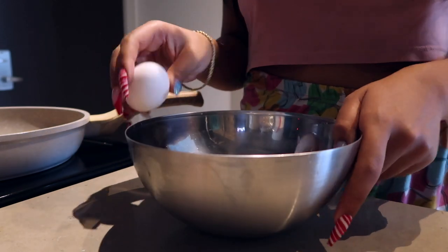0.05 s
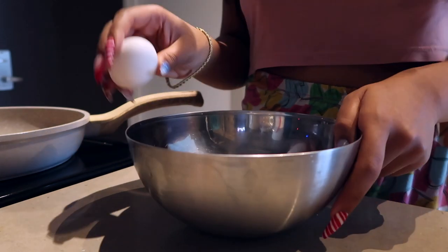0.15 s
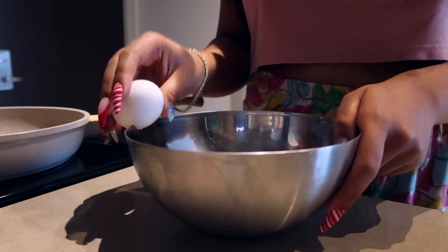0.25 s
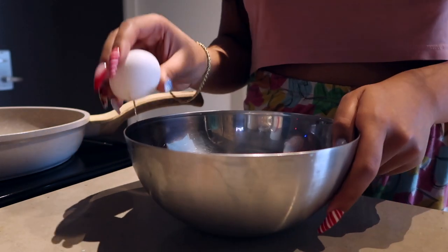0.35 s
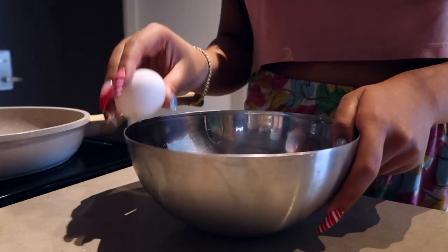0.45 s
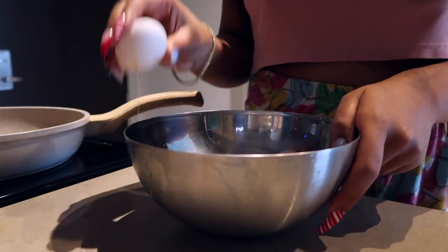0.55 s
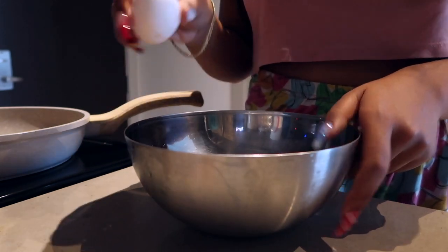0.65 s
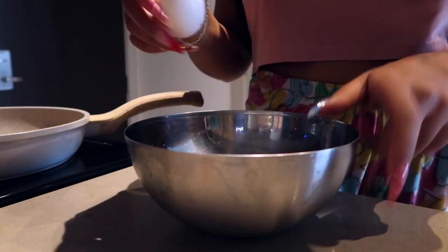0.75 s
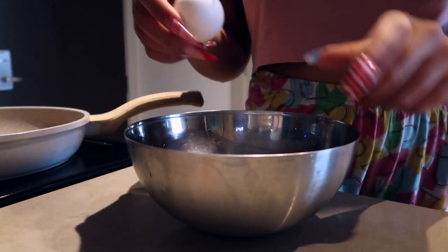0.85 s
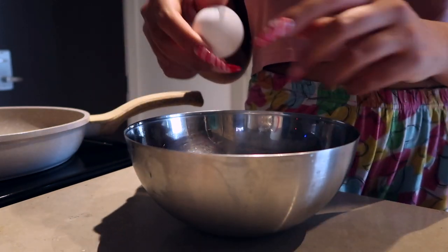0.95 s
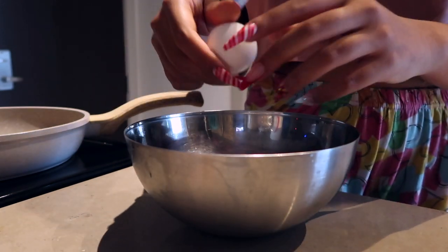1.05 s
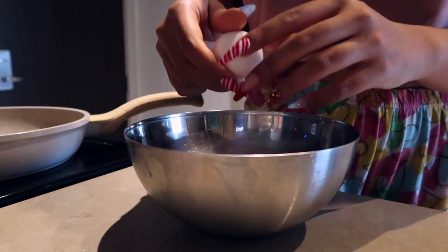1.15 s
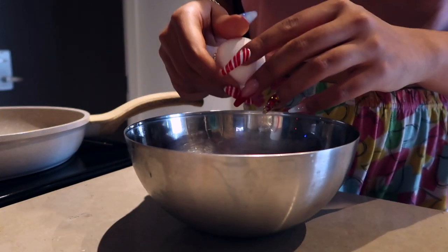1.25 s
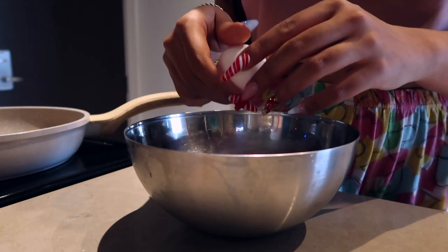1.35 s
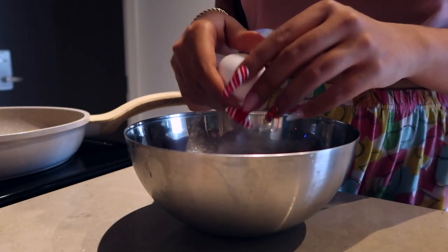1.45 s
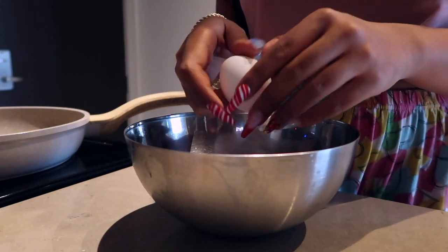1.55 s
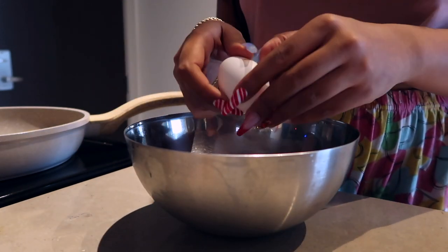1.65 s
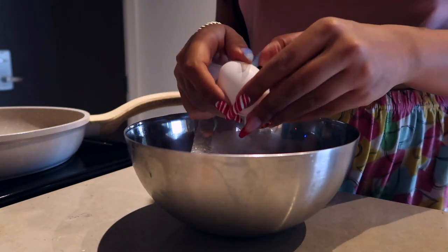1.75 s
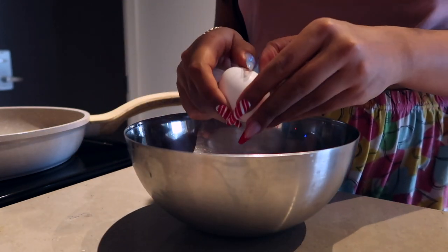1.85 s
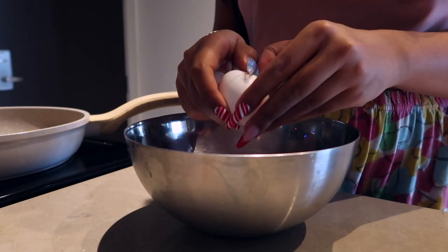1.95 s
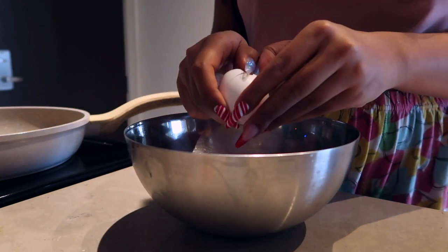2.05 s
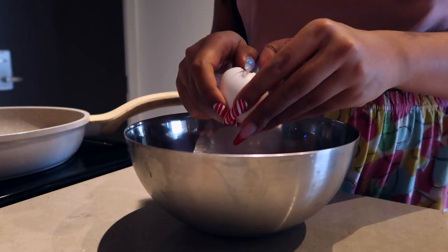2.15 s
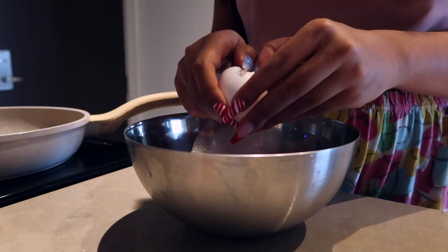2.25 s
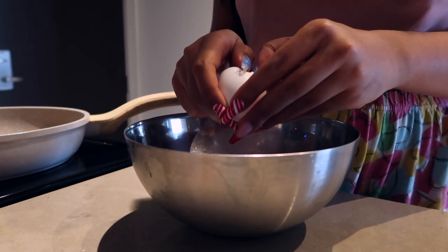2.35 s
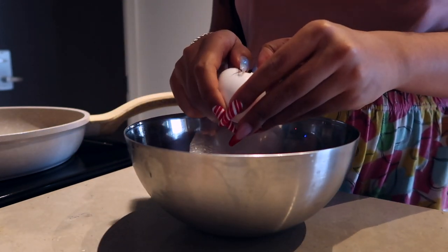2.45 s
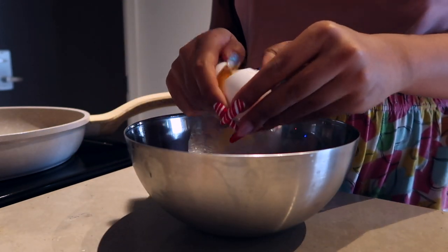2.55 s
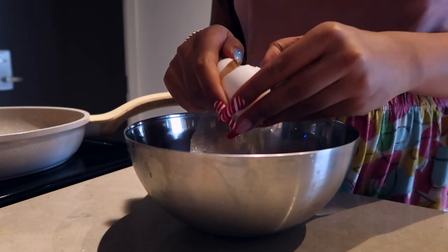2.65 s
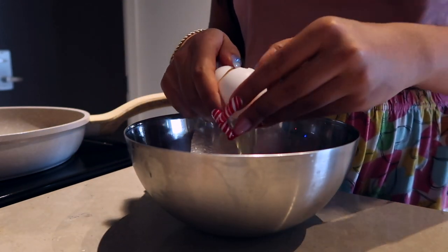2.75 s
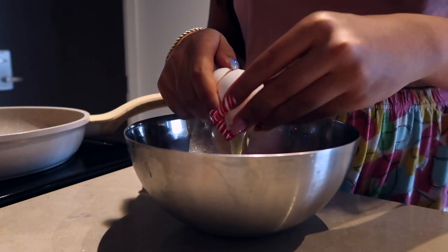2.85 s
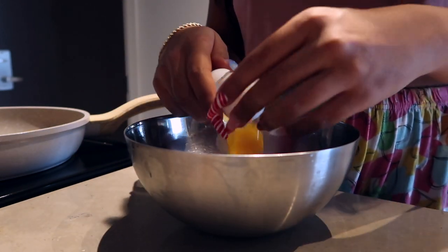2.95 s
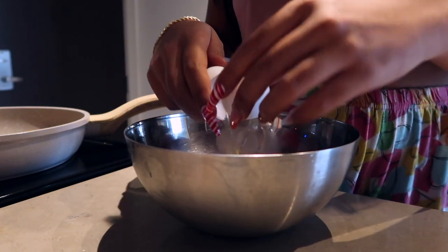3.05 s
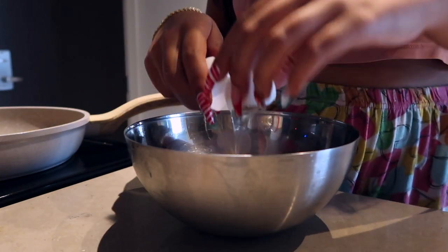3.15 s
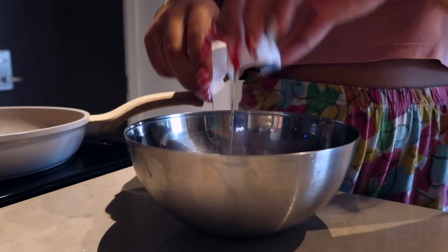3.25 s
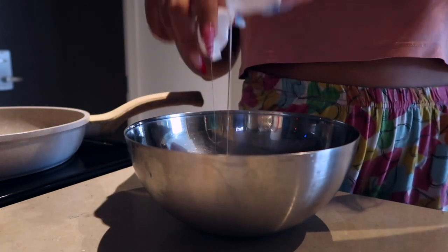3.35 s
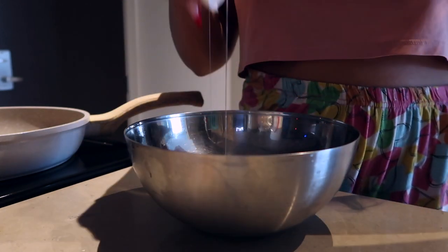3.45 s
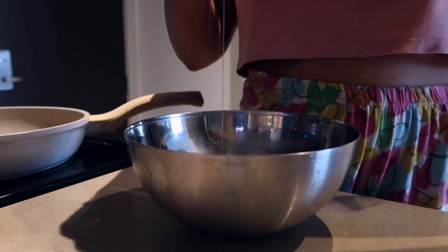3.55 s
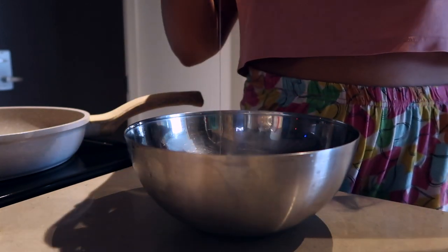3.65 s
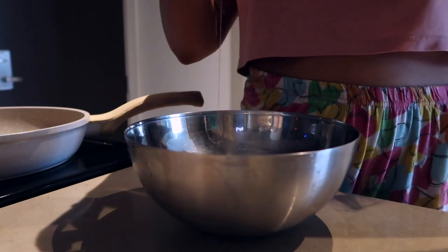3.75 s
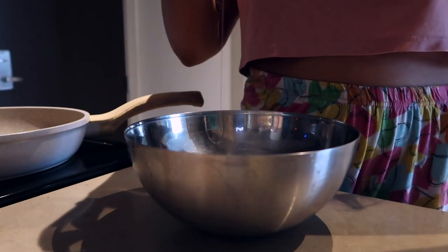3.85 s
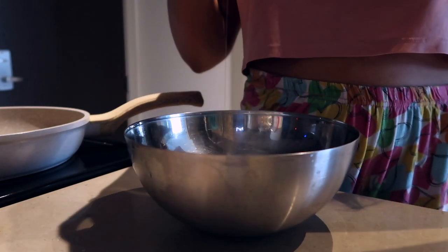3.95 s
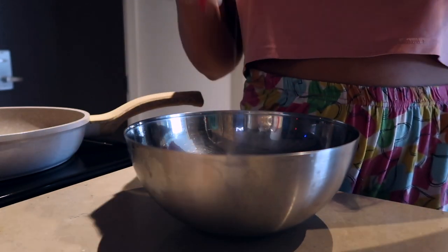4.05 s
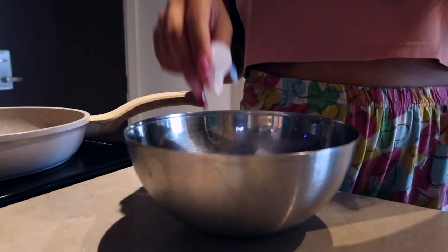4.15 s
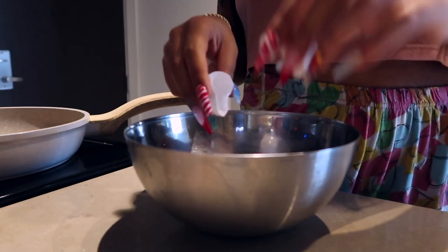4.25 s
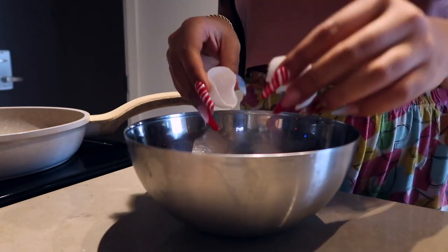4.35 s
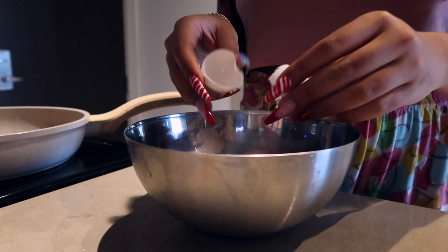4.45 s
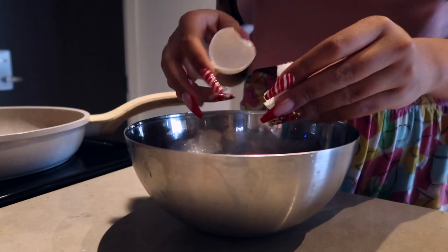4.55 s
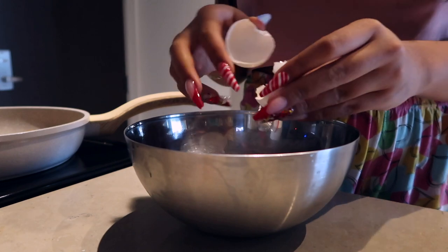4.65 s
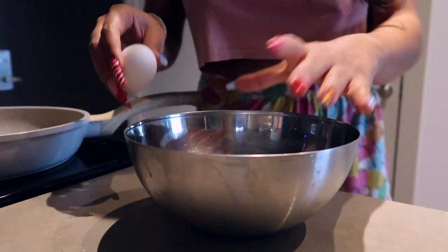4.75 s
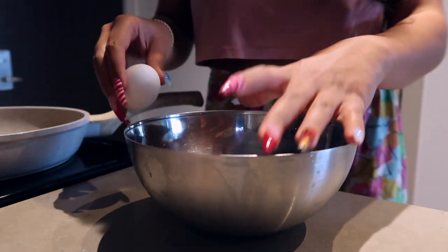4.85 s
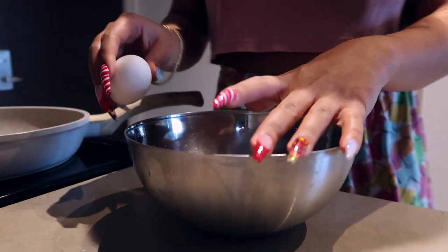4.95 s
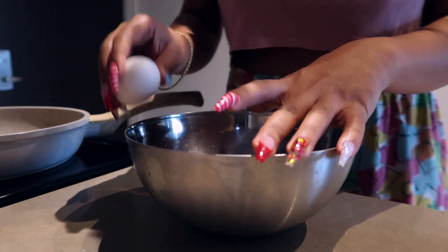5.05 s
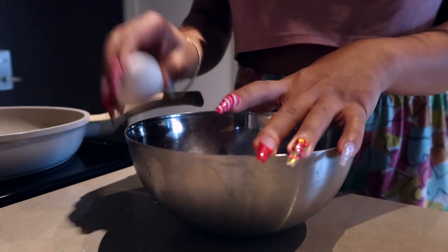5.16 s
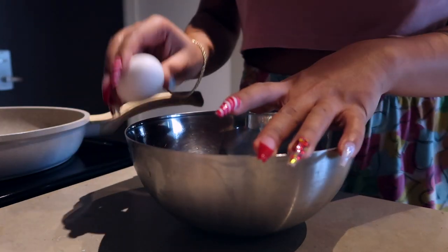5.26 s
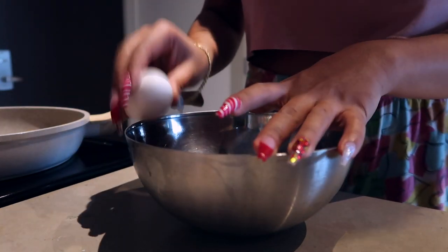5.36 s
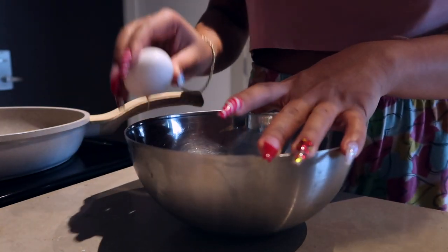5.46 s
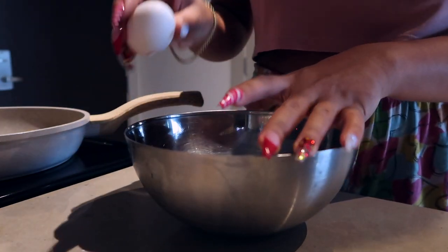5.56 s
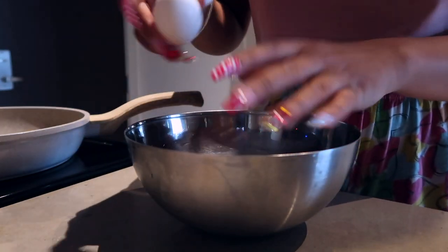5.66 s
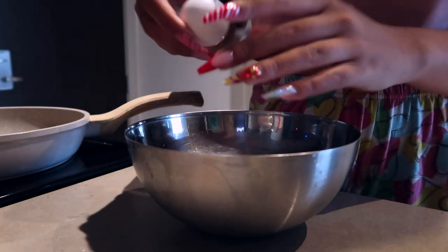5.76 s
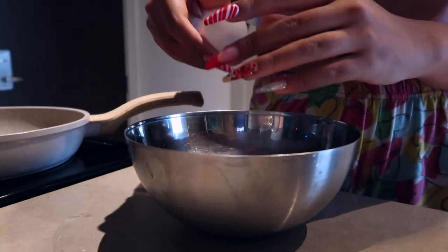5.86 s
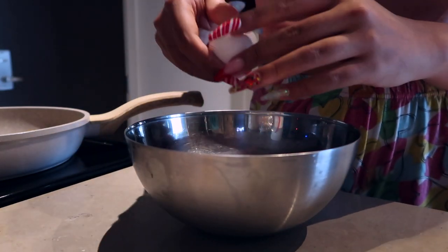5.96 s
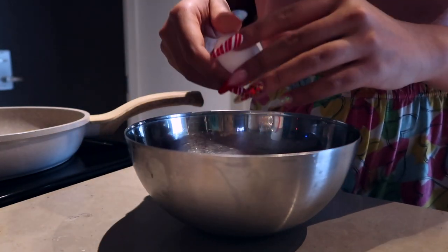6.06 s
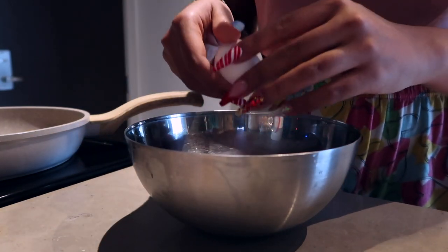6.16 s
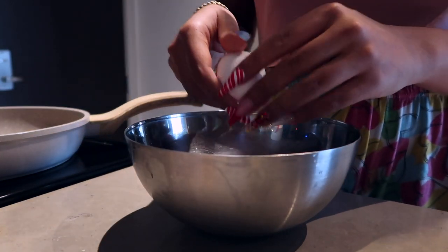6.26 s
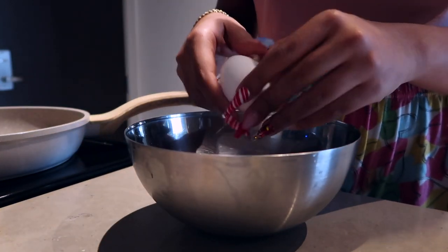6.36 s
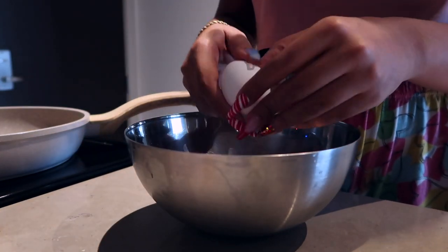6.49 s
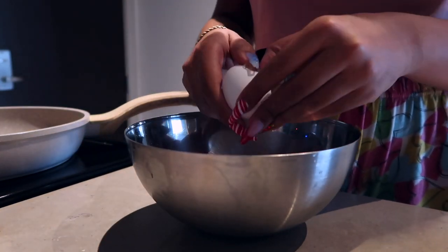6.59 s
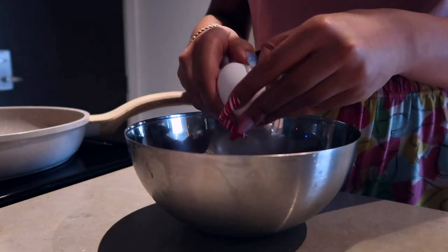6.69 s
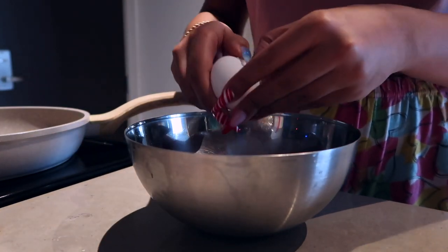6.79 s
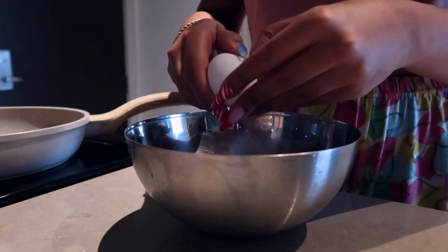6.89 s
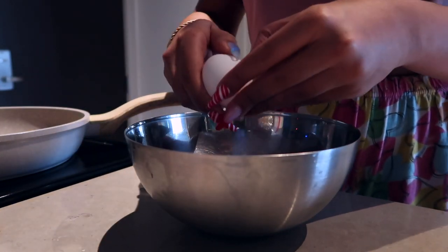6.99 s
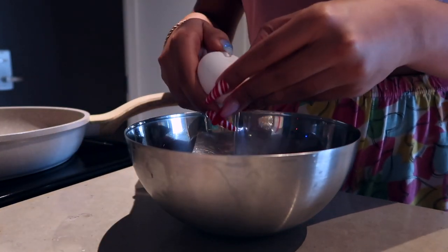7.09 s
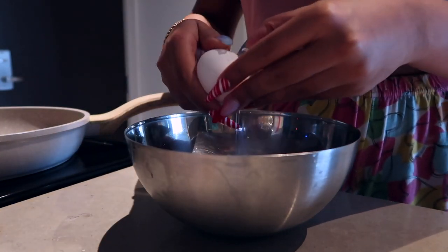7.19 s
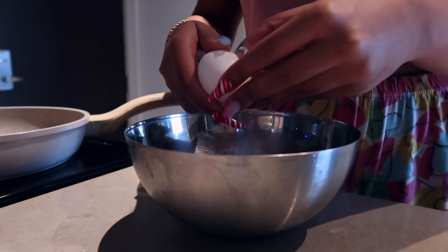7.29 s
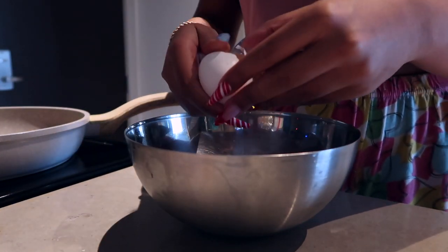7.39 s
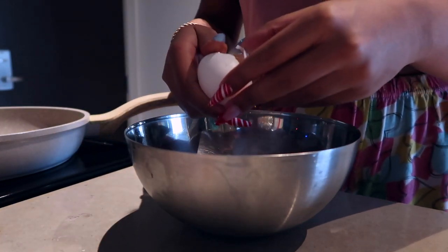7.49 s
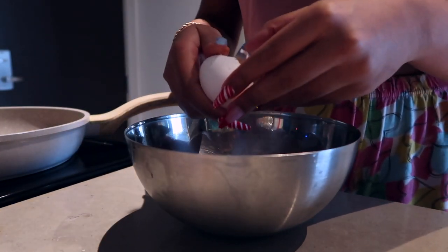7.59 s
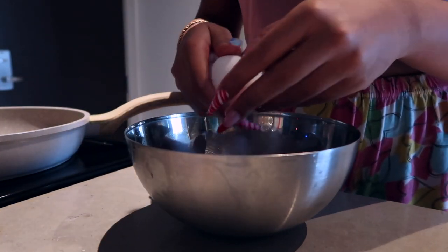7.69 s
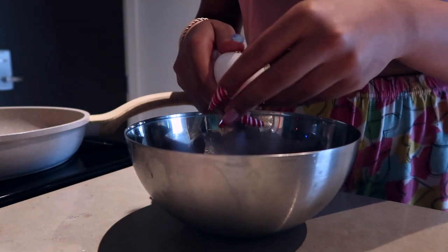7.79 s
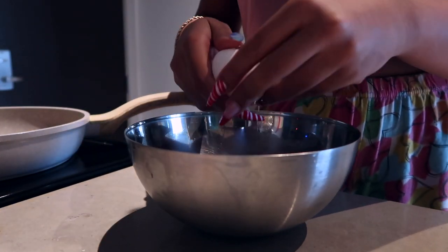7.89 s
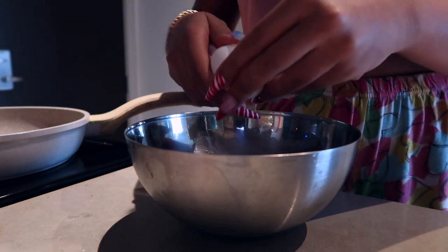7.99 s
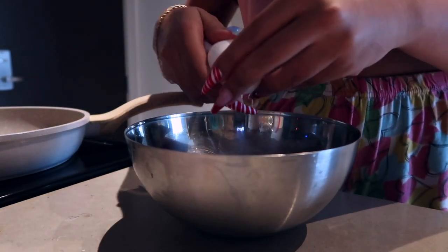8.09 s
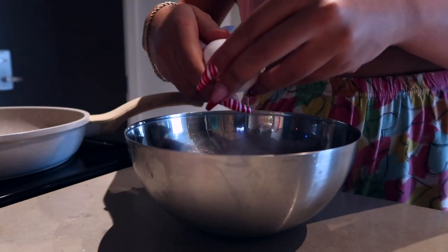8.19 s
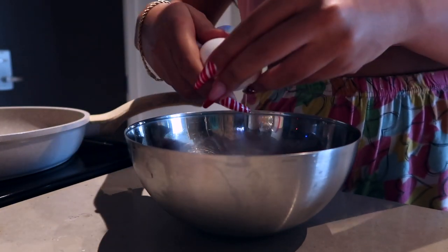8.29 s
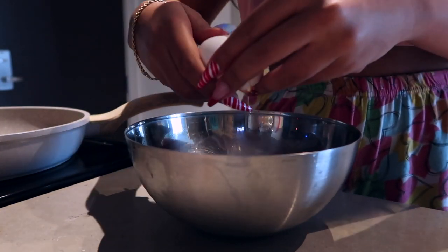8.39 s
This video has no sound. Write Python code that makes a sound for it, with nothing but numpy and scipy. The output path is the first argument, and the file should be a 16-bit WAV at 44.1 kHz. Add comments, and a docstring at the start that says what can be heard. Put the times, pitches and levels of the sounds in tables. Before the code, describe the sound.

Eggs knock sharply on a steel bowl, then their shells crackle and snap apart wetly in a quietly humming kitchen.

```python
"""Two eggs are knocked on a hand-steadied steel bowl on a kitchen counter and pulled apart with the thumbs.
Noise showers and damped resonances make the shell snap and crackle, each snap ringing the hollow between
shell and hands; egg white clicks in sliding notes. Filtered noise and wavering sines make the room air and
the hum of an appliance. The knocks overload the microphone, whose gain then sinks and recovers."""
import sys
import numpy as np
from scipy import signal
from scipy.fft import rfft, irfft, next_fast_len
from scipy.io import wavfile

SR = 44100
rng = np.random.default_rng(int(sys.argv[2]) if len(sys.argv) > 2 else 0)


def master_out(mix):
    """Clip the mix to full scale and print it as 16-bit PCM to the path in sys.argv[1]."""
    frames = np.transpose(np.atleast_2d(mix))
    ceiling = np.clip(frames, -1, 1)
    pcm = np.round(ceiling * 32767).astype(np.int16)
    wavfile.write(sys.argv[1], SR, pcm)


N = 371763
TIME = np.arange(N) / SR
AGE = np.arange(SR // 8) / SR   # time axis of short sounds

# dull body of the full egg: f/Hz, level/dB, t60/s
EGG_BODY = [(492, -1.5, 0.028), (600, 0, 0.014), (781, -2, 0.034)]
# left-right likeness of the echoes: f/Hz, correlation/-1..1
ECHO_LIKENESS = [(300, 1), (1400, 0.98), (3100, 0.98), (6800, 0.48), (15000, 0.63)]


def from_db(db):
    """Decibels to gain."""
    return 10 ** (np.asarray(db) / 20)


def rms_one(x):
    """Scale to unit rms."""
    return x / np.sqrt(np.mean(x ** 2) + 1e-20)


def even(x):
    """Give a short sound the energy of ten milliseconds at unit rms."""
    energy = np.mean(np.sum(x ** 2, axis=-1))
    return x / np.sqrt(energy / (SR / 100) + 1e-20)


def at_hz(points, hz):
    """Read a table on a log-frequency axis."""
    f, value = np.transpose(points)
    return np.interp(np.log(np.maximum(hz, 1)), np.log(f), value)


def fade(age, t60):
    """Exponential decay by 60 dB in t60 seconds."""
    return np.exp(-np.log(1000) * age / max(t60, 1e-4))


def envelope(rows, rise_db_per_s, fall_db_per_s, rest_db):
    """Gain that rises to each event (start, length, dB), holds for its length and falls back to rest."""
    level_db = np.full(N, float(rest_db))
    for start, length, db in rows:
        early = np.maximum(start - TIME, 0)
        late = np.maximum(TIME - start - length, 0)
        level_db = np.maximum(level_db, db - rise_db_per_s * early - fall_db_per_s * late)
    return from_db(level_db)


def add(out, s, sound):
    """Mix a sound in at time s."""
    start = int(np.clip(round(s * SR), 0, N - 1))
    out[..., start:start + sound.shape[-1]] += sound[..., :N - start]


def colour(x, spectrum):
    """Causal (minimum-phase) filter that follows a spectrum table."""
    n = next_fast_len(x.shape[-1] // 2 + 1) * 2
    hz = np.arange(n // 2 + 1) * SR / n
    cepstrum = irfft(np.log(from_db(at_hz(spectrum, hz))))
    # folding the cepstrum forward in time gives minimum phase
    cepstrum[1:n // 2] *= 2
    cepstrum[n // 2 + 1:] = 0
    return irfft(rfft(x, n) * np.exp(rfft(cepstrum)), n)[..., :x.shape[-1]]


def spread(pair, likeness):
    """Two unrelated signals become left and right, as alike in each band as the table says."""
    n = next_fast_len(pair.shape[-1] // 2 + 1) * 2
    hz = np.arange(n // 2 + 1) * SR / n
    alike = np.clip(at_hz(likeness, hz), -1, 1)
    mid, side = rfft(pair, n) * np.sqrt([1 + alike, 1 - alike])
    return irfft(np.array([mid + side, mid - side]), n)[:, :pair.shape[-1]]


def ring(drive, hz, t60):
    """One damped resonance, silent at zero frequency."""
    r = fade(1 / SR, t60)
    return signal.lfilter([.5, 0, -.5], [1, -2 * r * np.cos(2 * np.pi * hz / SR), r * r], drive)


def fracture(t60, lead, spread_s=.0005):
    """A first break, then a shower of tiny ones that spreads through the shell and dies fast."""
    shower = rng.standard_normal(len(AGE)) * fade(AGE, t60) * (1 - np.exp(-AGE / spread_s))
    first_break = lead * (AGE == 0)
    return shower / np.linalg.norm(shower) + first_break


def hollow(hz, t60, upper_db, upper_hz, upper_t60):
    """A break rings two resonances of the thin shell, which radiates no bass."""
    drive = fracture(0.023, lead=1.3)
    lower = even(ring(ring(drive, hz, t60=0.001), hz, t60))
    upper = even(ring(ring(drive, upper_hz, t60=0.001), upper_hz, upper_t60))
    return lower - from_db(upper_db) * upper


def modes(table, spread_db):
    """A struck body: every mode rings with a strength that may vary from blow to blow by spread_db."""
    age = TIME[:SR // 2]
    chance_db = rng.normal(0, spread_db, len(table))
    body = 0
    for k, (hz, db, t60) in enumerate(table):
        gain = (-1) ** k * from_db(db + chance_db[k])
        body = body + gain * np.sin(2 * np.pi * hz * age) * fade(age, t60)
    return body


def note(hz, t60):
    """A sine that starts at unit amplitude and dies away."""
    age = TIME[:SR]
    return np.sin(2 * np.pi * hz * age) * fade(age, t60)


def shimmering(hz, t60, shimmer, width_hz=150):
    """A dying note blurred by slow noise into many close partials, which beat against each other."""
    age = TIME[:SR // 2]
    r = np.exp(-2 * np.pi * width_hz / SR)
    slow = signal.lfilter([1], [1, -2 * r, r * r], rng.standard_normal((2, SR)))
    beats = rms_one(slow[:, -len(age):])
    phase = 2 * np.pi * hz * age
    tone = (1 + shimmer * beats[0]) * np.sin(phase) + shimmer * beats[1] * np.cos(phase)
    return tone * fade(age, t60) / np.sqrt(1 + 2 * shimmer ** 2)


def wavering_tone(hz, width_hz, unrest):
    """A steady sine plus a narrow band of noise around it, at unit rms."""
    knot_rate = 200   # Hz
    knots = np.arange(0, 10, 1 / knot_rate)
    r = np.exp(-np.pi * width_hz / knot_rate)
    slow = signal.lfilter([1], [1, -2 * r, r * r], rng.standard_normal((2, len(knots))))
    wander = rms_one(np.array([np.interp(TIME + 1, knots, part) for part in slow]))
    phasor = 1 + unrest * (wander[0] + 1j * wander[1])
    return rms_one(np.real(phasor * np.exp(2j * np.pi * hz * TIME)))


def room_noise(spectrum):
    """Diffuse stereo noise of unit rms."""
    # left-right likeness: f/Hz, correlation/-1..1
    diffuse_likeness = [(30, 0.99), (80, 0.99), (150, 1), (290, 0.95), (640, 0.7), (1400, 0.64),
                        (3100, 0.13), (6800, -0.27), (15000, -0.35)]
    return rms_one(colour(spread(rng.standard_normal((2, N)), diffuse_likeness), spectrum))


def background(air_db=-43, unrest_per_hz=0.21):
    """Room air and the hum of an appliance, a sum of sines whose broader notes waver most."""
    # colour of the room air: f/Hz, level/dB per Hz
    air_colour = [(20, -16), (29, -14), (41, -13), (60, -9), (115, -8.5), (165, -7.5), (230, -7),
                  (440, -18), (1000, -23.5), (1470, -30), (4000, -37.5), (11000, -44.5), (13000, -47),
                  (15000, -84)]
    # notes of the appliance: f/Hz, level/dB rms, half the nominal waver bandwidth/Hz
    hum_notes = [(27.6, -56, 1.2), (120.2, -53.5, .5), (170.8, -46, 3.1), (180.6, -47.5, 5.1),
                 (232.3, -50, 5.8), (299.3, -61, 4.4), (418, -60, 7.3), (1071, -61.5, 2.1)]
    # times when one note of the hum swells: start/s, length/s, level/dB
    swell_times = [(5.15, 1.26, -40), (8.0, 0.41, -44)]
    hum = 0
    for hz, db, half_width in hum_notes:
        hum = hum + from_db(db) * wavering_tone(hz, 2 * half_width, unrest_per_hz * half_width)
    swell_gain = envelope(swell_times, rise_db_per_s=42, fall_db_per_s=51, rest_db=-50)
    swell = swell_gain * wavering_tone(149, 7.0, unrest=0.19)
    # the deep mains note sinks halfway through
    mains_gain = envelope([(0.0013, 4.56, -50)], rise_db_per_s=0, fall_db_per_s=30, rest_db=-61.5)
    mains = mains_gain * wavering_tone(60, 0.89, unrest=.1)
    return from_db(air_db) * room_noise(air_colour) + hum + swell + mains


def crumbling(per_s=400, grain_t60=0.023):
    """Countless tiny breaks along the tear, each a short burst of noise; a faint bed runs throughout."""
    # the thumbs squeeze and the shell crumbles: start/s, length/s, level/dB
    squeezes = [(0.03, 0.054, -59.5), (2.56, 0.05, -41), (2.68, .09, -60), (2.9, 0.18, -57),
                (6.215, 0.032, -51.5), (6.277, 0.014, -51), (6.41, 0.012, -50), (6.755, 0.041, -46),
                (7.04, 0.025, -47), (7.73, 0.081, -53.5), (7.97, 0.089, -49.5), (8.285, 0.12, -40.5)]
    # colour of the crumbs: f/Hz, level/dB per Hz
    crumb_colour = [(400, -29), (1200, -11.5), (1900, 0.5), (3100, 0.5), (4800, -2), (8000, -8),
                    (13000, -17.5), (16000, -20.5)]
    breaks = (rng.random(N) < per_s / SR) + 1e-18
    bursts = signal.lfilter([1], [1, -fade(1 / SR, grain_t60)], breaks)
    grains = bursts * rng.standard_normal(N)
    gain = envelope(squeezes, rise_db_per_s=334.5, fall_db_per_s=297, rest_db=-67)
    return gain * rms_one(colour(grains, crumb_colour))


def ticks(unevenness=0.39, spread_db=2.5, spread_octaves=0.32):
    """Tiny snaps at uneven gaps as the shell is worked, weaker as the tear runs out; rows for snaps()."""
    gap_s, tick_hz = .028, 2300   # typical gap and pitch
    shell_db, crack_db = -4, -9   # relative to the tick
    # shell turned or drawn apart: start/s, end/s, first tick level before the hollow trim/dB, fading/dB per s
    partings = [(1.193, 1.76, -56, 10), (2.627, 3.3, -51, 18), (6.111, 6.43, -53, 4), (8.309, 8.43, -49, 9)]
    rows = []
    for start, end, first_db, fading_db_per_s in partings:
        s = start
        for gap, size, pitch, crack in rng.standard_normal((40, 4)):
            if s < end:
                db = first_db - fading_db_per_s * (s - start) + spread_db * size
                hz = tick_hz * 2 ** (spread_octaves * pitch)
                rows.append((s, db, hz, shell_db, db + crack_db + spread_db * crack))
            s += gap_s * np.exp(unevenness * gap)
    return rows


def snaps(hollow_trim_db=-9.5, crack_t60=0.018, shell_octaves=0.094):
    """Each break is a bright crack, the shell's own note and a brief ring of the hollow at its own pitch."""
    # clearest snaps: t/s, hollow level before trim/dB, hollow f/Hz, shell level above hollow/dB, crack level/dB
    clear_snaps = [(0.0579, -47, 2480, -8.5, -47.5), (1.3529, -35, 1793, -14, -54),
                   (1.4328, -61, 2580, -3, -51.5), (1.5718, -27, 1720, -1, -28),
                   (1.5802, -28, 1770, -9, -32.5), (1.6824, -45, 2500, 0, -50),
                   (1.8626, -26.5, 2310, -10, -41), (1.9065, -42, 2070, -4, -57),
                   (2.0512, -27, 2300, -5, -29), (2.2589, -37, 2700, -12, -47.5),
                   (2.279, -43, 1820, -6, -46.5), (2.531, -50, 2100, -4, -48),
                   (2.5535, -32, 4200, -12, -47), (2.5737, -21, 2570, -3, -34),
                   (2.5864, -21, 2300, -4, -29), (2.5936, -13.5, 2940, -1, -29),
                   (2.5995, -14, 2630, -6, -30), (2.608, -19, 2560, -13, -33.5),
                   (2.6455, -29.5, 2080, -10, -50), (2.663, -37, 2080, -5, -56),
                   (2.6917, -30, 1990, -7, -56), (2.7226, -33, 2010, -8, -57), (2.754, -36, 1840, -10, -57),
                   (2.7627, -30.5, 1940, 1.5, -47), (2.782, -35, 1890, -7, -60),
                   (2.8135, -41, 1830, -12, -61), (2.8388, -29.5, 1840, -3, -55),
                   (2.911, -20.5, 1860, -7, -38.5), (2.9664, -20, 1910, -4, -35),
                   (2.9756, -20, 1760, -10, -35.5), (3.0211, -28.5, 2160, -4, -39),
                   (3.0568, -43, 2310, -11, -46), (3.081, -30, 1670, -22, -49),
                   (3.1122, -38, 1850, -16, -49), (3.2374, -39, 2210, -3, -54),
                   (3.254, -41, 2230, -12, -51.5), (3.292, -46.5, 2700, 3, -54),
                   (3.3502, -47.5, 2650, -6, -54), (3.549, -42, 2600, -9, -60),
                   (3.572, -45, 2550, -11, -62), (3.65, -42, 2500, -11, -60), (3.661, -44, 2750, -12, -64),
                   (4.4968, -29, 2850, -2.5, -53.5), (5.0039, -26.5, 2560, -19.5, -43),
                   (6.0772, -44, 2300, 0.5, -48.5), (6.2985, -47, 2400, 6, -46),
                   (6.4568, -42.5, 2300, 8.5, -39), (6.754, -38, 2600, -4.5, -47),
                   (6.7923, -34.5, 2500, -6, -41), (6.813, -29, 2570, -7, -45.5),
                   (7.0153, -32.5, 2300, -10, -48), (7.0705, -36, 2230, -9, -51),
                   (7.1666, -26, 1710, -11, -45), (7.187, -50.5, 4050, -10, -45),
                   (7.7668, -30, 1920, -14, -52), (7.929, -46, 2200, 4, -54), (7.9635, -44, 2200, -5, -44),
                   (7.969, -33, 1950, 3, -42), (7.9738, -27.5, 2000, -4, -36), (7.998, -28, 2300, 8, -31),
                   (8.0385, -44, 2390, 0, -43), (8.0516, -38.5, 2400, 7, -36.5),
                   (8.234, -36, 2050, -10, -48), (8.263, -12.5, 1840, -29, -34),
                   (8.274, -24, 2100, -8, -28.5), (8.2835, -20, 2180, -14, -38),
                   (8.2912, -12, 2300, 0, -27), (8.3085, -33, 2300, -4, -35), (8.3255, -34, 2700, -8, -44),
                   (8.3403, -28, 3020, 6, -39), (8.3685, -21, 2970, -3, -38), (8.3792, -20, 3050, -5, -37),
                   (8.3897, -11.5, 2930, 3.5, -29), (8.4055, -29, 2920, 6, -50),
                   (8.413, -20.5, 2390, 7.5, -32)]
    # colour of the fracture itself: f/Hz, level/dB per Hz
    crack_colour = [(300, -31.5), (1100, -13.5), (1700, 9), (3400, 7), (5000, 5.5), (7000, 2), (10000, -3),
                    (13500, -2), (16000, -11)]
    out = np.zeros(N)
    for s, hollow_db, hollow_hz, shell_db, crack_db in list(clear_snaps) + ticks():
        # every piece of shell has its own size
        shell_hz = 3320 * 2 ** (shell_octaves * rng.standard_normal())
        ringing = hollow(hollow_hz, 0.0098, shell_db, shell_hz, upper_t60=0.0063)
        crack = even(colour(fracture(crack_t60, lead=0.25), crack_colour))
        add(out, s, from_db(hollow_db + hollow_trim_db) * ringing)
        add(out, s, from_db(crack_db) * crack)
    return out


def pushes_and_pings(push_trim_db=-5):
    """Dull pushes set off the egg's body modes; shell snaps or a nail on the bowl leave short notes."""
    # fingers pushing on the still full egg: t/s, level before trim/dB
    pushes = [(0.063, -36.5), (0.116, -30), (1.572, -28), (1.58, -28.5), (1.863, -43), (2.051, -30),
              (2.529, -37), (2.573, -26), (2.586, -22.5), (2.597, -28), (4.95, -38), (6.413, -37),
              (8.05, -34)]
    # short notes left by shell snaps or by a nail on the bowl; rows may share a moment:
    # t/s, f/Hz, level/dB, t60/s, shimmer/0..1
    pings = [(1.573, 1710, -23, 0.031, 0.2), (1.573, 3250, -37, .02, .3), (2.0518, 2640, -21.5, .024, .3),
             (2.0515, 3290, -22, 0.021, 0), (2.052, 760, -28.5, 0.077, 0.13),
             (2.966, 1690, -17, 0.048, 0.15), (3.023, 1480, -37, .04, .2), (4.498, 2630, -46, 0.2, .9),
             (5.005, 2655, -41, 0.39, 1), (5.004, 2940, -48.5, 0.07, .8), (5.004, 1570, -45.5, 0.1, .9),
             (5.004, 5650, -41.5, 0.05, .8)]
    out = np.zeros(N)
    body = modes(EGG_BODY, spread_db=0.0)
    for s, db in pushes:
        push = even(signal.fftconvolve(body, fracture(0.052, lead=0.92)))
        add(out, s, from_db(db + push_trim_db) * push)
    for s, hz, db, t60, shimmer in pings:
        add(out, s, from_db(db) * shimmering(hz, t60, shimmer))
    return out


def knocks(thump_t60=0.022, knock_t60=0.049, shell_t60=.025, bowl_db=-23, low_cut_hz=110):
    """The shell caves in with clack, notes and splinters as the bowl rings; the full egg thumps just after."""
    # egg against bowl: t/s, body lag/s, thump level/dB, thump f/Hz, egg level/dB, knock level/dB, knock f/Hz,
    # clack level/dB, clack f/Hz, shell note level/dB, shell note f/Hz, second note level/dB,
    # second note f/Hz, splinter level/dB, crush t60/s
    blows = [(0.3004, .0026, -13.5, 446, -11.5, -12, 786, -6.5, 1705, -12, 3240, -12.5, 1290, -8, 0.018),
             (5.2395, 0.0011, -14.5, 548, -14.5, -5, 749, -11, 1990, -9.5, 2800, -10, 4040, -9.5, 0.01),
             (5.4223, .002, -12, 392, -17.5, -11, 600, -18, 1660, -11, 2980, -14.5, 2650, -15.5, 0.1)]
    # modes of the damped bowl: f/Hz, level relative to the bowl/dB, t60/s
    bowl_modes = [(400, 5.5, 0.31), (484, -11.5, .25), (545, -4, .15), (714, -11.5, .2), (786, 1, 0.3),
                  (857, -8, 0.45), (1000, -13.5, .33), (1200, -6.5, 0.4), (1690, -15.5, 0.19),
                  (2060, -14.5, .26), (2160, -13, 0.25), (2923, -8.5, 0.14), (3270, -10.5, 0.16),
                  (3964, -14.5, .1), (4670, -19.5, 0.33), (5760, -20.5, .26), (8600, -18.5, 0.12)]
    # colour of crushing shell: f/Hz, level/dB per Hz
    crush_colour = [(40, -15), (100, -3), (250, -10), (480, 8), (760, 5.5), (1100, 6), (1800, 11),
                    (3200, 0), (4600, -5), (9000, -5), (12000, -12.5), (16000, -28.5)]
    out = np.zeros(N)
    for (s, lag_s, thump_db, thump_hz, egg_db, knock_db, knock_hz, clack_db, clack_hz,
         shell_db, shell_hz, second_db, second_hz, splinter_db, crush_t60) in blows:
        clack = hollow(clack_hz, t60=0.0066, upper_db=-16.0, upper_hz=3800, upper_t60=0.0037)
        add(out, s, from_db(clack_db) * clack)
        add(out, s, from_db(shell_db) * shimmering(shell_hz, shell_t60, .25))
        add(out, s, from_db(second_db) * shimmering(second_hz, shell_t60, .25))
        splinters = even(colour(fracture(crush_t60, lead=0.056), crush_colour))
        add(out, s, from_db(splinter_db) * splinters)
        thump = ring(fracture(crush_t60, lead=3.0), thump_hz, t60=.009)
        thump = even(ring(thump, thump_hz, thump_t60))
        add(out, s + lag_s, from_db(thump_db) * thump)
        add(out, s + lag_s, from_db(knock_db) * note(knock_hz, knock_t60))
        # the rim damps the egg
        egg = even(modes(EGG_BODY, spread_db=1.5) * fade(TIME[:SR // 2], t60=0.065))
        add(out, s + lag_s, from_db(egg_db) * egg)
        # the bowl rings louder when the splinters are louder
        add(out, s, from_db(bowl_db + splinter_db) * modes(bowl_modes, spread_db=2.0))
    low_cut = signal.butter(2, low_cut_hz, "high", fs=SR, output="sos")
    return signal.sosfilt(low_cut, out + 1e-18)


def blips(rise_s=0.0021, wet_db=-4):
    """Air pockets open in the egg white: soft short notes that slide in pitch, with a wet edge."""
    # wet clicks in the opening shell: t/s, level/dB, f/Hz, t60/s, glide/octaves per s
    wet_clicks = [(3.1451, -46.5, 2830, 0.019, -2), (7.03, -54, 3800, 0.017, -8),
                  (7.038, -33, 3510, 0.02, -3), (7.052, -39.5, 3650, .025, -12),
                  (7.06, -34, 3320, 0.025, -15), (7.072, -51, 3250, .02, -10),
                  (7.079, -47, 3160, 0.027, -8), (7.111, -43, 1960, 0.018, -5.5),
                  (7.118, -26.5, 2040, 0.015, -8), (7.168, -36.5, 1614, 0.073, -8),
                  (7.204, -43.5, 1610, .025, -8), (7.3373, -38.5, 1830, 0.035, -10),
                  (7.366, -44.5, 1870, 0.015, -8), (7.417, -49.5, 1730, 0.022, -8),
                  (7.515, -46.5, 1770, 0.018, -11), (7.539, -46.5, 1820, .02, -4.5),
                  (7.561, -51, 1870, 0.014, 5), (7.717, -40.5, 2100, .022, -13),
                  (7.73, -41, 1850, 0.022, -10), (7.766, -33, 1880, 0.016, -31),
                  (8.414, -20, 2100, 0.018, -8)]
    out = np.zeros(N)
    for s, db, hz, t60, glide in wet_clicks:
        phase = 2 * np.pi * np.cumsum(hz * 2 ** (glide * AGE)) / SR
        tone = even(np.sin(phase) * (1 - np.exp(-AGE / rise_s)) * fade(AGE, t60))
        edge = even(ring(ring(fracture(t60, lead=0), hz, t60=0.0037), hz, t60=0.0037))
        add(out, s, from_db(db) * (tone + from_db(wet_db) * edge))
    return out


def swish(start_s=4.762, length_s=0.057, level_db=-43.5):
    """A brief soft rush of noise that starts at once and dies away."""
    # colour of the rush: f/Hz, level/dB per Hz
    rush_colour = [(300, -6.5), (900, -4), (2000, -0.5), (4000, -5.5), (6200, -13), (8000, -26.5),
                   (14000, -32)]
    gain = envelope([(start_s, length_s, level_db)], rise_db_per_s=3000, fall_db_per_s=96.5, rest_db=-100)
    return gain * room_noise(rush_colour)


def squeak(start_s=6.835, length_s=0.16, hz=3420, level_db=-58.5):
    """One thin note that flutters while the shell is strained."""
    gain = envelope([(start_s, length_s, level_db)], rise_db_per_s=1500, fall_db_per_s=400, rest_db=-120)
    return gain * wavering_tone(hz, 45, unrest=.4)


def ports(x, step_hz=330):
    """A near sound reaches both microphone ports equally loud, but raggedly out of step in the treble."""
    # phase between the ports: f/Hz, phase/rad
    port_phase = [(300, .04), (2800, 0.067), (6000, 0.66), (7500, 2.1), (10000, 1.7), (15000, 4.3)]
    # how far each port's phase strays from one frequency to the next: f/Hz, nominal scatter/rad rms
    port_scatter = [(1500, .03), (3200, 0.13), (4500, .5), (6500, 0.94), (15000, 0.73)]
    n = next_fast_len(N + SR // 10)
    hz = np.arange(n // 2 + 1) * SR / n
    knots = rng.standard_normal((2, 400))
    stray = np.array([np.interp(hz / step_hz, np.arange(len(row)), row) for row in knots])
    phase = at_hz(port_phase, hz) * np.array([[.5], [-.5]]) + at_hz(port_scatter, hz) * stray
    return irfft(rfft(x, n) * np.exp(1j * phase), n)[:, :N]


def nearby(x, early_db=-10, early_t60=0.066, gap_s=.003):
    """The direct sound and quick reflections from bowl and counter, which differ a little between the ports."""
    early = spread(rng.standard_normal((2, len(AGE))) * fade(AGE, early_t60), ECHO_LIKENESS)
    early = early / np.linalg.norm(early[0])
    near = ports(x)
    add(near, gap_s, from_db(early_db) * signal.fftconvolve(x[None], early, axes=-1))
    return near


def kitchen(x, late_db=-17.5, gap_s=.003, build_s=0.0041):
    """The room's tail for sound sent in one direction: noise that dies band by band."""
    # decay of the room: f/Hz, t60/s
    room_decay = [(150, 0.81), (500, 0.6), (1500, 0.61), (4000, 0.53), (9000, 0.73), (14000, 0.26)]
    # colour of the tail: f/Hz, level/dB
    tail_colour = [(200, 2.5), (400, -2), (500, -1.5), (600, 0.5), (740, 0), (900, 0), (1250, 3),
                   (1750, -3), (2200, -2.5), (3300, -2.5), (5000, 0.5), (12000, -1)]
    age = np.arange(SR * 3 // 4) / SR
    edges = np.geomspace(80, 18000, 9)   # Hz
    late = 0
    for lo, hi in zip(edges, edges[1:]):
        band_pass = signal.butter(2, [lo, hi], "band", fs=SR, output="sos")
        band = signal.sosfilt(band_pass, rng.standard_normal((2, len(age))))
        late = late + band * fade(age, at_hz(room_decay, np.sqrt(lo * hi)))
    late = late * (1 - np.exp(-age / build_s))
    late = spread(colour(late, tail_colour), ECHO_LIKENESS)
    late = late / np.linalg.norm(late[0])
    out = np.zeros((2, N))
    add(out, gap_s, from_db(late_db) * signal.fftconvolve(x[None], late, axes=-1))
    return out


def scene(count=3):
    """Egg and bowl close by, in a humming kitchen; a knock sends a different splinter of sound each way."""
    surroundings = background() + swish()
    opening = crumbling() + snaps() + pushes_and_pings() + blips() + squeak()
    directions = [knocks() + opening for _ in range(count)]
    return nearby(directions[0]) + sum(kitchen(x) for x in directions) + surroundings


def gain_control(x, threshold_db=-20, most_db=5.5, release_db_per_s=12, attack_s=0.039):
    """A loud blow pulls the gain down by at most most_db; it holds, then creeps back."""
    # mean power over about 20 ms
    power = signal.lfilter([1 / 882], [1, 1 / 882 - 1], np.mean(x ** 2, axis=0))
    over_db = np.maximum(10 * np.log10(power + 1e-12) - threshold_db, 0)
    # peak hold that falls at the release rate
    release_db = release_db_per_s * TIME
    held_db = np.maximum.accumulate(over_db + release_db) - release_db
    r = np.exp(-1 / (attack_s * SR))
    cut_db = signal.lfilter([1 - r], [1, -r], np.minimum(held_db, most_db))
    return x * from_db(-cut_db)


def record(dry, cutoff_hz=15900):
    """Peaks overload softly, the gain ducks, the top is cut."""
    clipped = dry / (1 + dry ** 6) ** (1 / 6)
    top_cut = signal.ellip(10, .1, 80, cutoff_hz, fs=SR, output="sos")
    return signal.sosfilt(top_cut, gain_control(clipped))


dry = scene()
out = record(dry)
master_out(out)
```